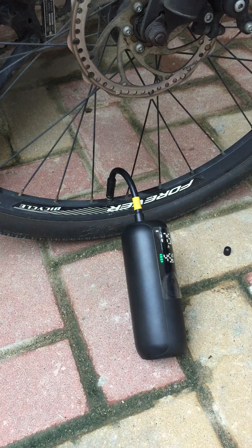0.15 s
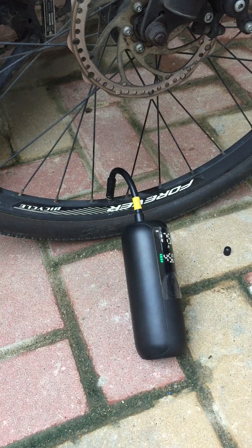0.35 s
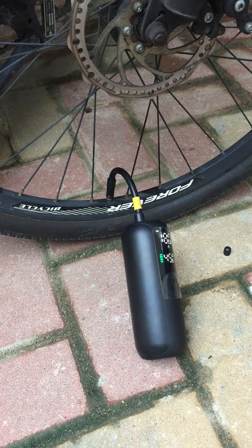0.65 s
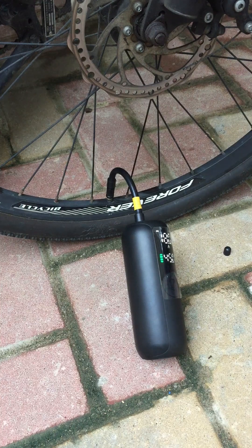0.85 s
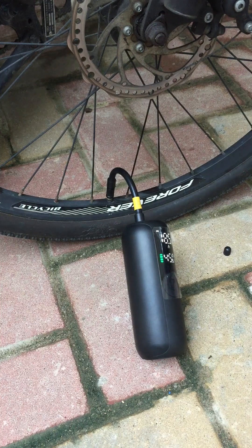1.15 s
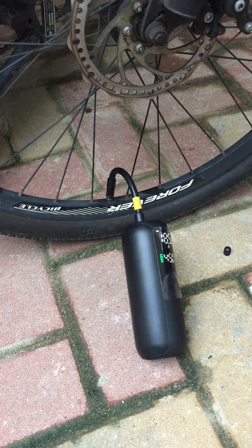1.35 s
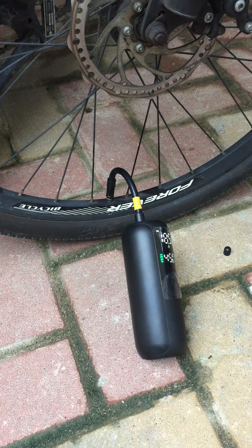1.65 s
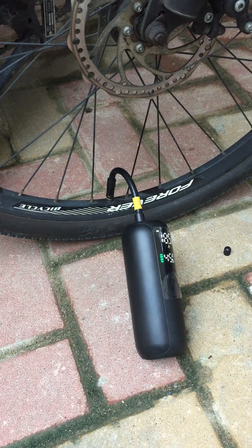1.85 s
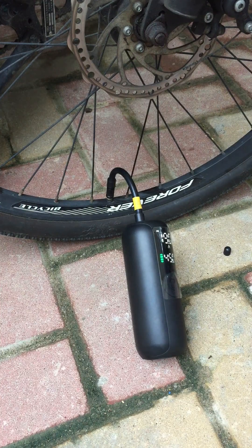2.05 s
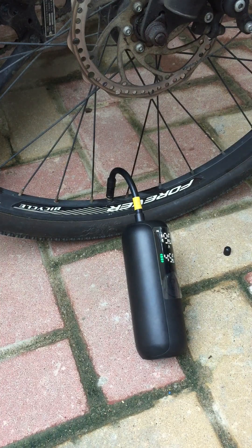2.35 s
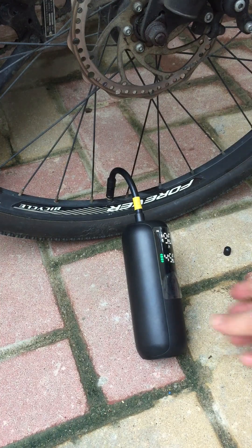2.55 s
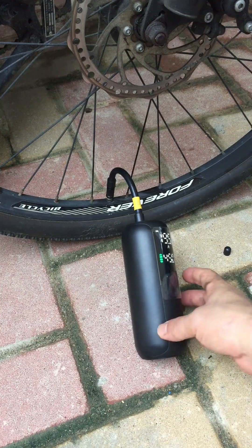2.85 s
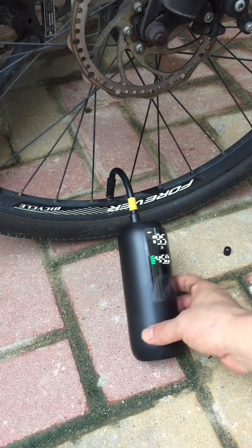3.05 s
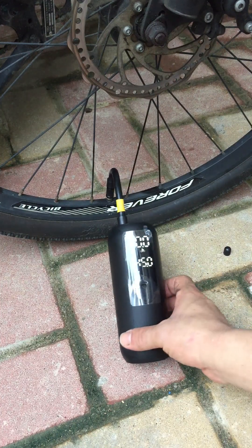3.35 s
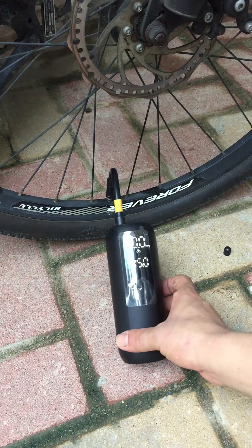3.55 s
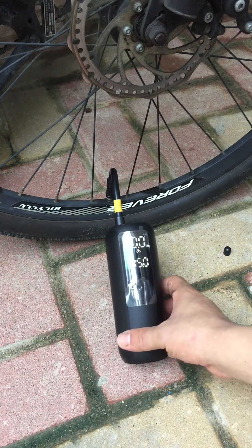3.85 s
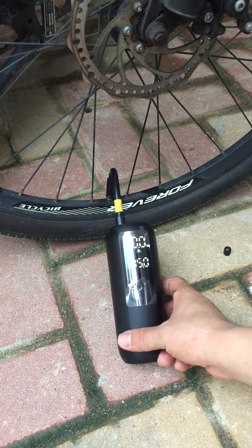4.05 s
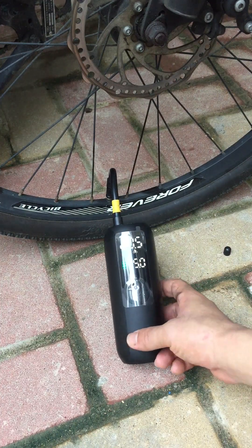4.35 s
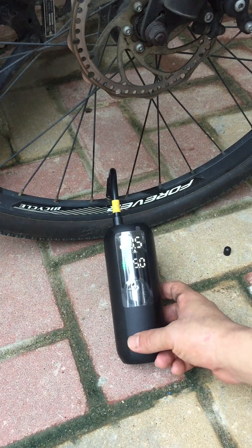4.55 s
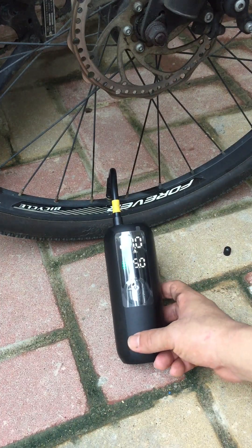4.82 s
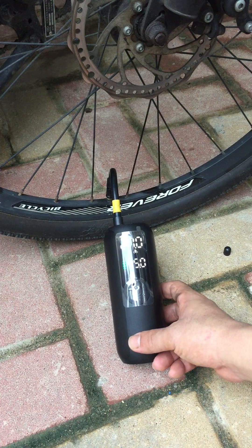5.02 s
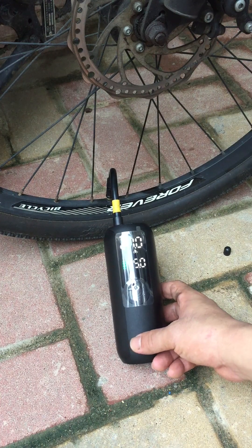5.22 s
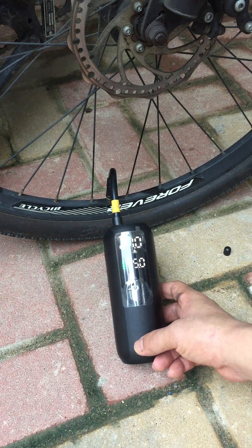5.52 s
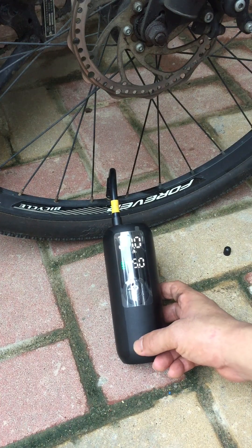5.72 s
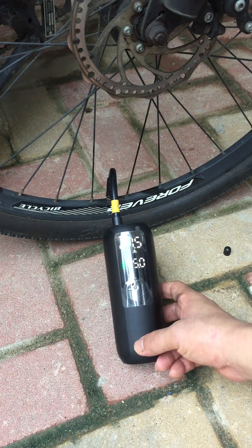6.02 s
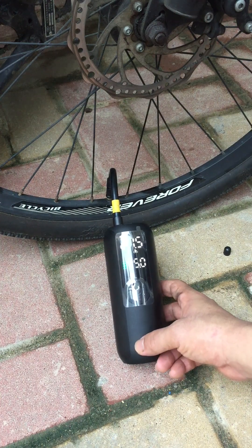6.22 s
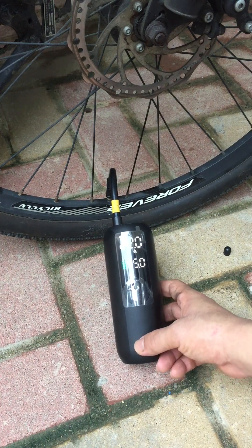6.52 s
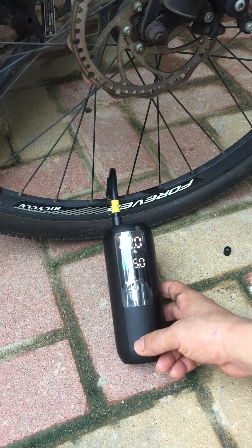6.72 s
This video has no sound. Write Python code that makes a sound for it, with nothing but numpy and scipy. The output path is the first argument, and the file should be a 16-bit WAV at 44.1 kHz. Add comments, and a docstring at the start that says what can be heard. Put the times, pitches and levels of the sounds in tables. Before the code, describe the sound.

A small electric compressor pumps up a bicycle tyre on a brick pavement, heard close by. Its rapid piston knocking blends into a steady buzz with gear whine, rattle and hissing air, swelling about twice a second. Around three seconds in, a hand turns the pump: the tone shifts and the case scuffs faintly on the brick. It keeps running, its pitch sinking very slightly.

```python
"""Battery tyre compressor

A small compressor pumps up a bicycle tyre on a brick pavement, about 56 strokes a second, slowing
as pressure builds. In every turn of the crank the gear whines under load, the piston knocks, air
hisses and the slack gear rattles; whine and rattle swell twice a second. About three seconds in,
a hand takes hold of the pump and turns it, which changes the colour of its case."""
import sys
import numpy as np
from scipy import signal
from scipy.fft import rfft, irfft
from scipy.io import wavfile
from scipy.ndimage import uniform_filter1d, map_coordinates

SR = 44100
rng = np.random.default_rng(int(sys.argv[2]) if len(sys.argv) > 2 else 0)


def unload_audio(sound):
    """Save the sound as a 16-bit wav file, at the path given as the first command line argument."""
    columns = np.transpose(np.atleast_2d(sound))
    # keep every value between -1 and 1, then stretch to whole-number steps
    steps = np.round(np.clip(columns, -1, 1) * 32767)
    wavfile.write(sys.argv[1], SR, steps.astype(np.int16))


N = 303408
TIME = np.arange(N) / SR
CRANK_HZ, GEAR_TEETH = 56.606, 35  # crank rate at the start; tooth meshes per turn
KNOCK_HZ, RATTLE_HZ, EDGE_HZ = 622, 2280, 15800
RATTLE_SWELL = dict(delay_s=-.025, attack_s=.06, hold_s=.02, release_s=.19, lift_db=4.6)


def drone(turns, grip, unevenness=0.02):
    """Fourier synthesis: whatever repeats with every stroke sounds as harmonics of the crank rate."""
    # crank harmonics: harmonic number, level/dB lying, level/dB held
    harmonics = [(1, -53, -52.5), (2, -43, -42.5), (3, -60, -57), (4, -41.5, -41), (5, -46.5, -48),
                 (6, -48, -45), (7, -45, -45.5), (8, -45, -46.5), (9, -38.5, -41), (10, -38.5, -36),
                 (11, -29.5, -33.5), (12, -36, -34.5), (13, -39, -33.5), (14, -37.5, -40),
                 (15, -43.5, -41.5), (16, -42, -34.5), (17, -50, -37), (18, -40, -41.5), (19, -40.5, -40.5),
                 (20, -53.5, -58), (21, -45.5, -50.5), (22, -49, -48), (23, -41.5, -50), (24, -42.5, -39.5),
                 (25, -40, -42), (26, -36, -42), (27, -63, -50.0), (28, -48, -49.9), (29, -52.8, -61),
                 (30, -41.9, -40), (31, -35.5, -43), (32, -38, -42.5), (33, -33, -36), (34, -31, -29),
                 (35, -28.5, -28.5), (36, -35.5, -31), (37, -45, -41), (38, -46, -37), (39, -47, -42),
                 (40, -40, -39.7), (41, -37, -32), (42, -44.2, -37.5), (43, -48, -51), (44, -41, -55.9),
                 (45, -55, -66), (46, -43.5, -40.5), (47, -47, -48), (48, -50.8, -45), (49, -45, -48),
                 (50, -43, -47), (51, -46.6, -39), (52, -66, -59), (53, -59, -53.6), (54, -53.5, -43),
                 (55, -42, -46), (56, -50, -55), (57, -65.7, -72), (58, -46.9, -47.5), (59, -44, -43.5),
                 (60, -43, -41), (61, -57, -56), (62, -43, -49)]
    # envelope of the tooth buzz above them: f/Hz, level/dB lying, level/dB held
    tooth_buzz = [(3560, -51.5, -50), (4200, -45, -54), (4520, -52.5, -54.5), (4960, -47.5, -53),
                  (5420, -49.5, -57), (5600, -46, -57), (6170, -61, -59), (6910, -53, -50.5),
                  (7670, -62, -58), (8650, -54.5, -49.5), (9900, -62, -65.5), (15000, -68, -64)]
    phases = stroke_phases()
    order = np.arange(len(phases))
    hz = order * CRANK_HZ
    out = np.zeros(N)
    for pose, share in ((1, 1 - grip), (2, grip)):
        db = spectrum(tooth_buzz, pose, hz)
        db[1:len(harmonics) + 1] = np.array(harmonics)[:, pose]
        amplitude = gain_of(db) * (order > 0) * (hz < EDGE_HZ)
        wave = irfft(phases * amplitude) * (len(phases) - 1)
        out += share * np.interp(turns, np.arange(len(wave)) / len(wave), wave, period=1)
    return out * (1 + unevenness * wander(34))


def stroke_phases(size=4096):
    """Phase spectrum of one turn: the timing of gear load and impacts aligns the harmonics."""
    turn = np.arange(size) / size
    whine = bump(turn, .6, .074) * np.sin(2 * np.pi * GEAR_TEETH * turn)
    knock = .5 * ring(turn, .71, hz=KNOCK_HZ, decay_s=.0035)
    rebound = .24 * ring(turn, .8, hz=901, decay_s=.0054)
    click = .26 * ring(turn, .745, hz=3093, decay_s=.00059)
    case = .34 * ring(turn, .79, hz=RATTLE_HZ, decay_s=.0086)
    pressure = .1 + bump(turn, .597, .077) + bump(turn, .79, .035) + .39 * bump(turn, .96, .063)
    uneven_teeth = .28 * pressure * rng.standard_normal(size)
    # the unbalanced crank rocks all turn long
    shake = 1.28 * uniform_filter1d(rng.standard_normal(size), size // 10, mode="wrap")
    stroke = whine + knock + rebound + click + case + uneven_teeth + shake
    return np.exp(1j * np.angle(rfft(stroke)))


def rush(turns, grip, level_db=1.0, grit=0.15):
    """Source and filter: noise of valve air, piston slap and slack gear excites the case resonances."""
    # spectral density of air and friction noise: f/Hz, level/dB lying, level/dB held
    air = [(56.0, -67, -70), (110.0, -73, -74), (200.0, -80, -79), (440, -81.2, -81.1), (644, -65, -66.5),
           (1120, -72.7, -66.5), (1670, -71, -74), (2740, -71, -69), (4040, -71, -83.5), (5870, -82.5, -75),
           (8450, -74.5, -80.5), (10200, -78, -76.5), (13000.0, -77.5, -77), (15000.0, -76, -75.5)]
    # resonances of the plastic case: f/Hz, bandwidth/Hz, gain/dB lying, gain/dB held
    case_modes = [(962, 79, 7, 3.5), (1466, 270, 7.5, 8.5), (1984, 270, 7.5, 12.5), (2215, 120, 14.5, 12.5),
                  (3235.0, 400, -3, 1), (4110, 470, -1.5, 13.5), (5530, 620, 12.5, 3.8), (6910, 260, 9, 6),
                  (8000, 230, 7, 10), (8750, 320, 4, 9.5)]
    spurt = .77 * bump(turns, .56, .085)
    slap = .45 * bump(turns, .77, .035)
    rattle = 1.25 * bump(turns, .925, .07) * gain_of(.55 * swell(**RATTLE_SWELL))  # as the load lets go
    envelope = np.sqrt(.34 + spurt ** 2 + slap ** 2 + rattle ** 2)  # incoherent sources add in power
    envelope *= np.exp(grit * wander(650))
    drive = rfft(unit_rms(envelope * rng.standard_normal(N)))
    hz = np.fft.rfftfreq(N, 1 / SR)
    low_cut = 1 / (1 + (62 / (hz + 1)) ** 4)
    out = np.zeros(N)
    for pose, share in ((1, 1 - grip), (2, grip)):
        db = spectrum(air, pose, hz)
        for centre, width, *lift in case_modes:
            db += lift[pose - 1] / (1 + (2 * (hz - centre) / width) ** 2)
        out += share * irfft(drive * gain_of(db + level_db) * low_cut, N)
    return out * np.sqrt(SR) / 2


def throb(pump):
    """Amplitude modulation: as the teeth pair up anew, case, rattle and hiss swell, then whine and knock."""
    hz, whole = np.fft.rfftfreq(N, 1 / SR), rfft(pump)
    whine = band(hz, GEAR_TEETH * CRANK_HZ - 30, 150)
    rattle = .75 * band(hz, RATTLE_HZ, 200) + .3 * band(hz, 2800, 300)
    knock = band(hz, KNOCK_HZ, 200)
    case = band(hz, 1000, 160)
    hiss = band(hz, 8700, 1500)
    for window, db in (
            (case, swell(delay_s=-.07, attack_s=.09, hold_s=.11, release_s=.08, lift_db=2.5)),
            (rattle, swell(**RATTLE_SWELL)),
            (hiss, swell(delay_s=-.01, attack_s=.05, hold_s=.2, release_s=.05, lift_db=1.6)),
            (whine, swell(delay_s=0, attack_s=.17, hold_s=.04, release_s=.26, lift_db=2.3)),
            (knock, swell(delay_s=.24, attack_s=.07, hold_s=.03, release_s=.26, lift_db=1.3))):
        pump = pump + irfft(whole * window, N) * (gain_of(db) - 1)
    return pump


def swell(delay_s, attack_s, hold_s, release_s, lift_db):
    """Modulation envelope in dB about its mean: one trapezoid for each surge of the gear train."""
    # surges, about two a second: t/s, relative strength
    surges = [(-0.25, .8), (0.28, 1.0), (0.845, 1.05), (1.39, 1.05), (1.915, 1.0), (2.46, 1.0),
              (2.975, 1.25), (3.495, .95), (4.01, .95), (4.54, .95), (5.07, .9), (5.55, .7), (6.06, .85),
              (6.53, .75)]
    level = np.zeros(N)
    for start, strength in surges:
        age = TIME - start - delay_s
        rise = np.clip(age / attack_s, 0, 1)
        fall = np.clip(1 - (age - attack_s - hold_s) / release_s, 0, 1)
        level += strength * rise * fall
    return lift_db * (level - level.mean())


def squeal(turns, gain_db=-14.5, at=.72, width=.073, centre_hz=2160, rise=.051, scatter_rad=1.23):
    """Linear chirp: at the top of each swell the gear overruns after the load, once in every stroke."""
    age = (turns - at + .5) % 1 - .5  # in turns, from the middle of the chirp
    stroke = np.floor(turns - at + 1.5).astype(int)
    phase = scatter_rad * rng.standard_normal(1000)[stroke]
    cycles = centre_hz / CRANK_HZ * (age + .5 * rise * age ** 2 / width)
    excess = np.maximum(gain_of(swell(**RATTLE_SWELL)) - 1, 0)
    return gain_of(gain_db) * excess * bump(turns, at, width) * np.sin(2 * np.pi * cycles + phase)


def scuffs(width_hz=70):
    """Friction noise: the case rubs on the brick in short, dull, narrow-band swells."""
    # rubs as the pump is turned: t/s, Gaussian width/s, f/Hz, level/dB
    rubs = [(3.34, 0.014, 410, -46), (3.43, 0.026, 355, -42), (3.53, .06, 370, -48), (3.77, .08, 380, -54)]
    out = np.zeros(N)
    for centre_s, width_s, hz, db in rubs:
        noise = unit_rms(wander(width_hz) * np.cos(2 * np.pi * hz * TIME))
        out += gain_of(db) * np.exp(-.5 * ((TIME - centre_s) / width_s) ** 2) * noise
    return out


def echoes(pump, grip, strength=.17, above_hz=3400, shift_s=.00015, tremor_s=.00002, count=9):
    """Comb filtering: rim, spokes and bricks reflect the treble on paths that shift as the pump is moved."""
    hz = np.fft.rfftfreq(N, 1 / SR)
    treble = irfft(rfft(pump) / (1 + (above_hz / (hz + 1)) ** 6), N)
    heard = treble.copy()
    for delay_s in np.geomspace(.0011, .0075, count) * rng.uniform(.9, 1.1, count):
        path_s = delay_s + grip * (shift_s * rng.standard_normal() + tremor_s * wander(.89))
        reflection = map_coordinates(treble, [(TIME - path_s) * SR], order=3)
        heard += strength * rng.choice([-1, 1]) * reflection
    return pump - treble + heard / np.sqrt(1 + count * strength ** 2)


def ring(turns, at, hz, decay_s):
    """Damped oscillator, struck once in every crank turn."""
    age_s = (turns - at) % 1 / CRANK_HZ
    return np.exp(-age_s / decay_s) * np.sin(2 * np.pi * hz * age_s)


def bump(turns, at, width):
    """Periodic Gaussian pulse; position and width are in crank turns."""
    return np.exp(-.5 * (((turns - at + .5) % 1 - .5) / width) ** 2)


def band(hz, centre, half_width):
    """Flat-topped band-pass response."""
    return np.exp(-((hz - centre) / half_width) ** 4)


def wander(rate_hz):
    """Low-pass Gaussian noise of unit rms."""
    hz = np.fft.rfftfreq(N, 1 / SR)
    return unit_rms(irfft(rfft(rng.standard_normal(N)) * np.exp(-(hz / rate_hz) ** 2), N))


def spectrum(rows, column, hz):
    """Spectral envelope: one table column interpolated over log frequency."""
    rows = np.array(rows)
    return np.interp(np.log(hz + 1), np.log(rows[:, 0] + 1), rows[:, column])


def curve(rows):
    """Linear interpolation of a time table at every sample."""
    return np.interp(TIME, *np.transpose(rows))


def gain_of(db):
    """Amplitude ratio of a level in decibels."""
    return 10 ** (np.asarray(db) / 20)


def unit_rms(x):
    """Normalisation to an rms of 1."""
    return x / np.sqrt(np.mean(x ** 2) + 1e-20)


def scene(jitter_turns=.00026):
    """Phase locking: one slightly unsteady crank drives every part of the pump."""
    # crank rate, falling as pressure builds: t/s, f/Hz
    crank_rate = [(0, 56.606), (0.7, 56.498), (2, 56.313), (3, 56.159), (4, 55.963), (5, 55.791),
                  (6, 55.654), (6.88, 55.561)]
    # hold of the hand: t/s, grip (0 lying on the ground, 1 held and turned)
    handling = [(2.92, 0.05), (3.3, 0.78), (4.2, 0.98)]
    turns = np.cumsum(curve(crank_rate)) / SR + jitter_turns * wander(9.7)
    grip = curve(handling)
    pump = throb(drone(turns, grip) + rush(turns, grip)) + squeal(turns)
    return (echoes(pump, grip) + scuffs())[None]


def record(dry):
    """Band limiting by a linear-phase low-pass filter."""
    low_pass = signal.firwin(511, EDGE_HZ, window=("kaiser", 9), fs=SR)
    return signal.oaconvolve(dry, low_pass[None], "same")


dry = scene()
out = record(dry)
unload_audio(out)
```